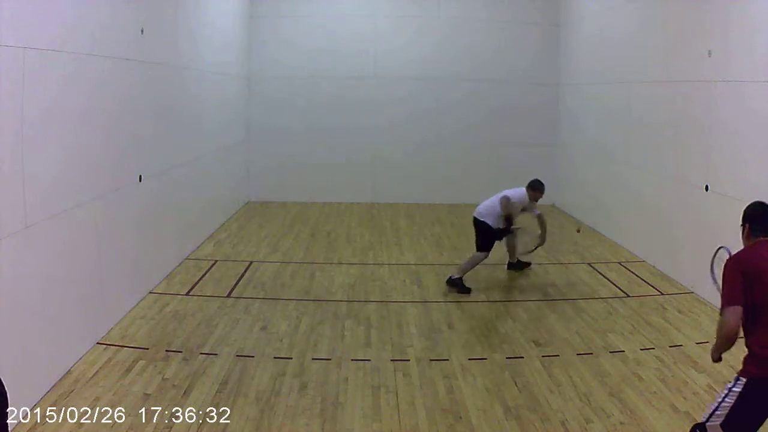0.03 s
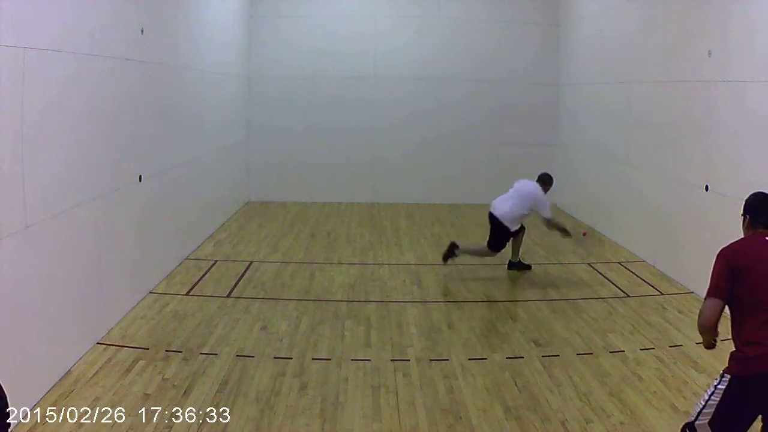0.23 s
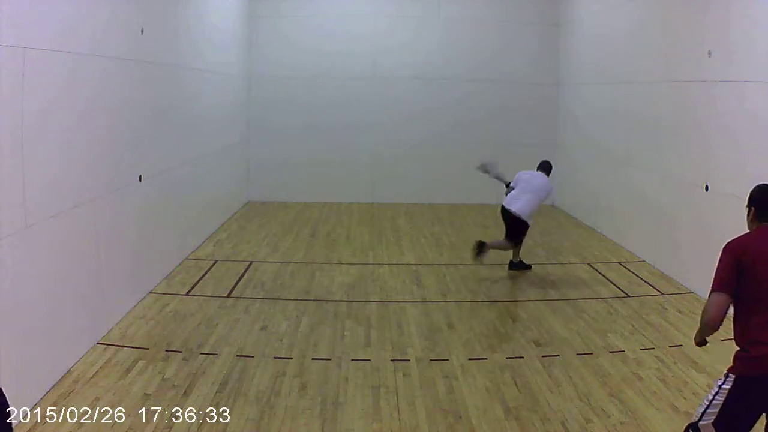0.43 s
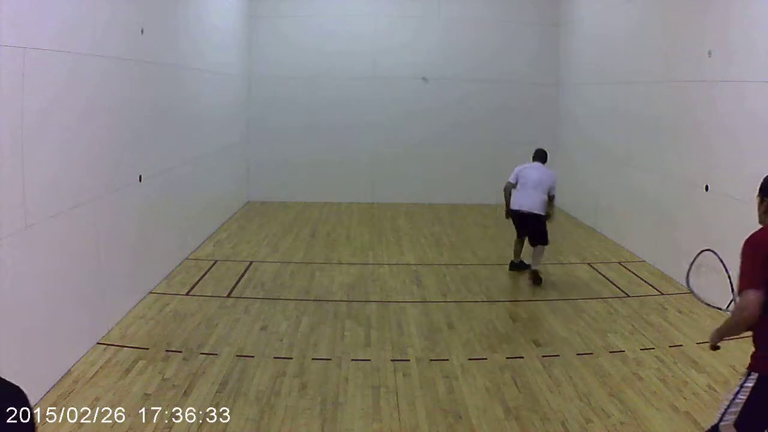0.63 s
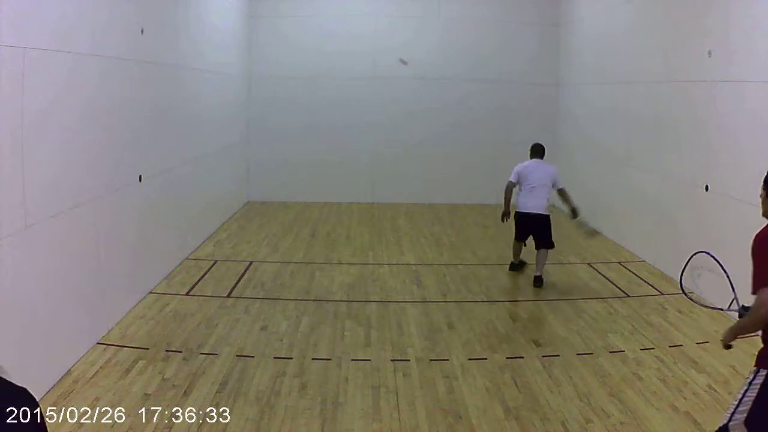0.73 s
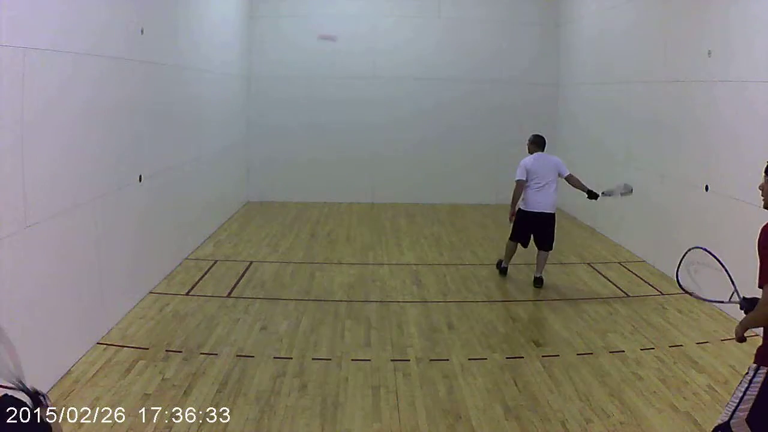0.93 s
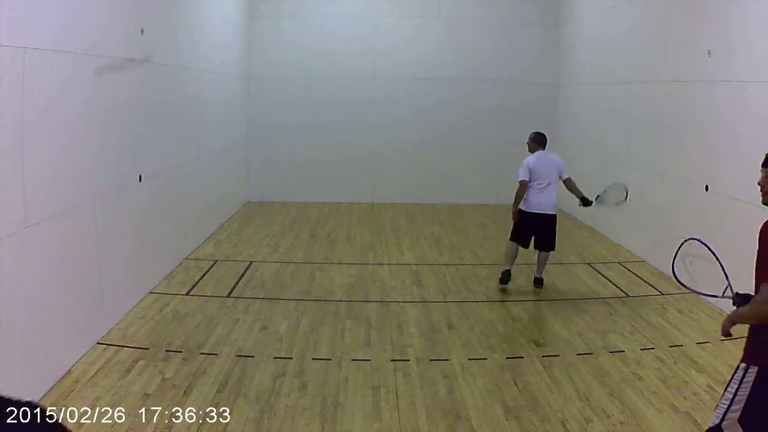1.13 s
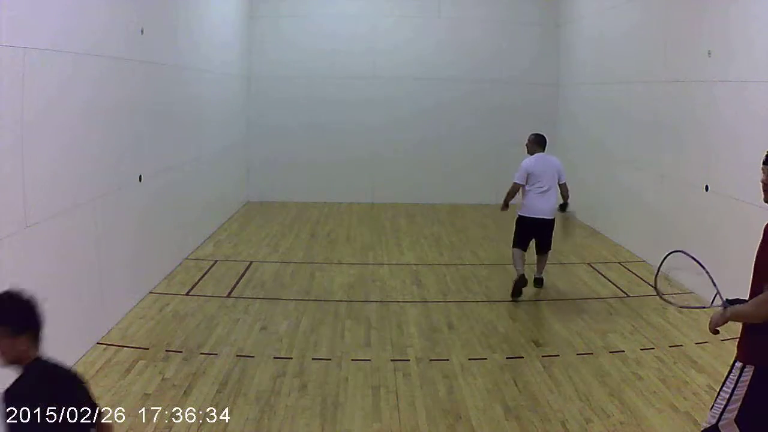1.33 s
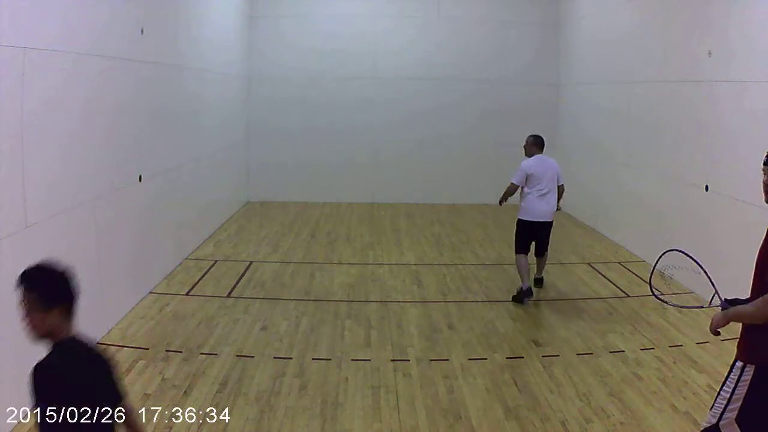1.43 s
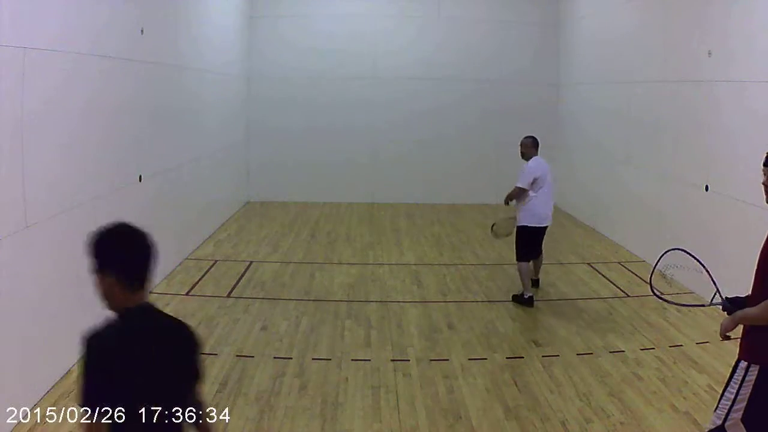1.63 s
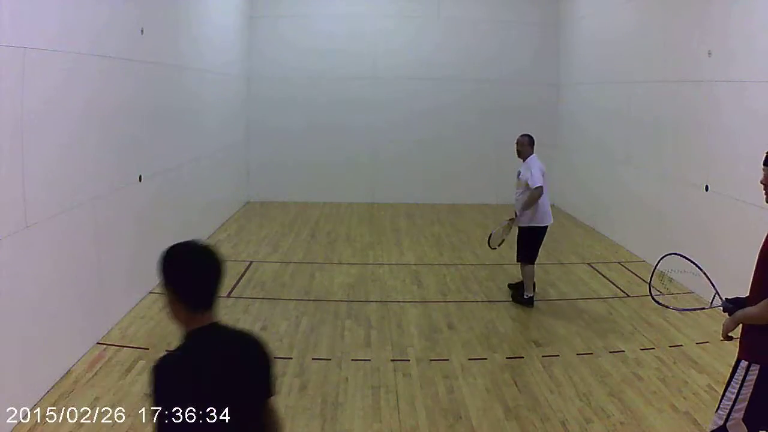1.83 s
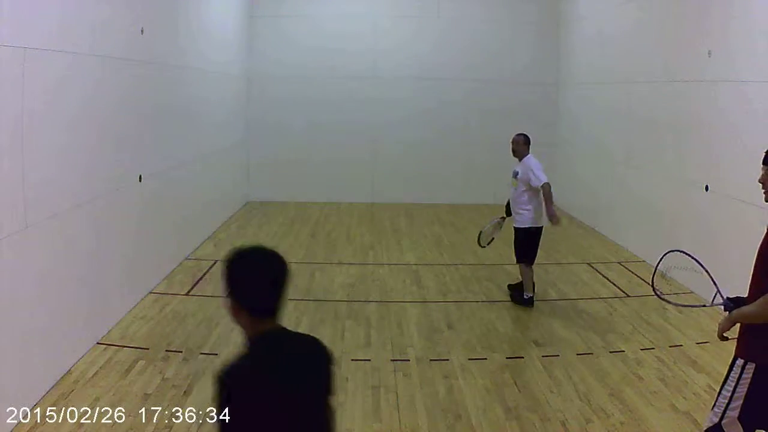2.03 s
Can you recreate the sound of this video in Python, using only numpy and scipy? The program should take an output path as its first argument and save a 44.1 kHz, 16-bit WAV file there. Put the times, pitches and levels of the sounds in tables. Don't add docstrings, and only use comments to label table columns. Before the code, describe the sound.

Three quick ball impacts, the second loudest and clipped, burst into a huge ringing reverberation in a closed court; later a faint bounce and soft footfalls on boards, heard distantly through a dull microphone.

```python
import sys
import numpy as np
from scipy import signal
from scipy.fft import rfft, irfft
from scipy.io import wavfile

SR = 44100
rng = np.random.default_rng(int(sys.argv[2]) if len(sys.argv) > 2 else 0)


def wav_record(signal):
    frames = np.transpose(np.atleast_2d(signal))
    bounded = np.clip(frames, -1, 1)
    quanta = np.round(bounded * 32767).astype(np.int16)
    wavfile.write(sys.argv[1], SR, quanta)


def how_loud(loudness_db):
    steps = np.asarray(loudness_db, float) / 20
    return 10 ** steps


N = 92610


def evened(x):
    return x / np.sqrt(np.mean(x ** 2) + 1e-20)


def read(points, hz):
    f, value = np.transpose(points)
    return np.interp(np.log(hz + 1), np.log(f + 1), value)


def add(mix, s, sound):
    part = mix[round(s * SR):][:len(sound)]
    part += sound[:len(part)]


def colour(x, points):
    gain = how_loud(read(points, np.fft.rfftfreq(len(x), 1 / SR)))
    return irfft(rfft(x) * gain, len(x))


def ring(hz, db, t60, t):
    return how_loud(db - 60 * t / t60) * np.sin(2 * np.pi * hz * t)


def hall_air():
    # (frequency [Hz], level [dB per Hz])
    hum_density = [(20, -8), (64, -3.5), (140, -3.5), (230, -12), (900, -17), (1650, -23.5), (1950, -34),
                   (8000, -37.5)]
    return how_loud(-33) * evened(colour(rng.standard_normal(N), hum_density))


def court(direct_db):
    # (frequency [Hz], reverberation time t60 [s])
    decay_times = [(60, 0.4), (150, 0.4), (300, 4.82), (800, 5.61), (1600, 3.84), (2600, 3.13), (4000, 1.8),
                   (8000, 1.1)]
    # (delay [s], gain against the direct sound)
    first_echoes = [(.0031, .9), (.0057, -1.1), (.0093, 1.1), (0.0139, -0.33), (.0178, .45)]
    build_s, flutter_s, flutter_db, flutter_fade_s = 0.0067, 0.065, -0.5, 0.59
    spacing = 20
    taps, t = np.zeros(2 * N), np.arange(2 * N) / SR
    at = np.arange(0, 2 * N - spacing, spacing)
    taps[at + rng.integers(0, spacing, len(at))] = rng.choice([-1., 1.], len(at))

    hz, frame_s, spectrum = signal.stft(taps, SR, nperseg=1024)
    decay = how_loud(-60 * frame_s / read(decay_times, hz)[:, None])
    tail = signal.istft(spectrum * decay, SR, nperseg=1024)[1][:2 * N]

    flutter = flutter_db * np.exp(-t / flutter_fade_s) * np.cos(2 * np.pi * t / flutter_s)
    tail = tail * how_loud(flutter) * (1 - np.exp(-t / build_s))
    front = 1. * (t == 0)
    for s, gain in first_echoes:
        front[round(s * SR)] = gain
    return tail / 15 + how_loud(direct_db + 16) * front


def steps():
    # (time [s], level [dB], floor pitch [Hz], t60 [s])
    footfalls = [(.01, -41, 101.7, 0.15), (1.10, -34, 99.4, 0.54), (1.284, -33, 206, 0.18),
                 (1.288, -26.5, 94, 0.35), (1.35, -35, 163.6, 0.82), (1.446, -44.5, 140, 0.28),
                 (1.537, -32.5, 107.8, 0.21), (1.612, -30.5, 105.9, 0.57), (1.675, -33, 152.7, 0.55),
                 (1.889, -36.5, 147.8, 0.1)]
    wet_db, mode_spread, rise_s = 11, 0.288, 0.0029
    out, t = np.zeros(N), np.arange(SR // 2) / SR
    for s, db, hz, t60 in footfalls:
        jitter = 0.37 * rng.uniform(-0.925, 1, 5)
        ratios = np.exp(mode_spread * (np.linspace(-1, 1, 5) + jitter))
        thud = sum(ring(hz * k, db, t60 / k, t) for k in ratios)
        add(out, s, thud * np.minimum(t / rise_s, 1))
    boom = signal.fftconvolve(out, court(direct_db=-61))[:N] / 10
    return out + how_loud(wet_db) * boom


def blow(low_db, crack_db):
    # (frequency [Hz], level [dB], t60 [s])
    shell_modes = [(640.6, 9, 0.012), (778.4, 11, 0.014), (951.7, 4.5, 0.011), (1646, -9.5, 0.06),
                   (1250, -13, 0.011)]
    # (frequency [Hz], level [dB], t60 [s])
    low_modes = [(304.7, 4, 0.028), (374.4, -0.5, 0.039), (140, -6, 0.074), (73, -8, 0.057)]
    contact_s, crack_rise_s = 0.0011, 0.00033
    t = np.arange(4000) / SR
    tune = 1 + 0.034 * rng.standard_normal()
    shell = sum(ring(hz * tune, db, t60, t) for hz, db, t60 in shell_modes)
    inside = sum(ring(hz * tune, db + low_db, t60, t) for hz, db, t60 in low_modes)
    crack = ring(2860, crack_db + 29.5, 0.0024, t)
    snap = ring(3930, crack_db + 23, 0.0034, t)
    body = (shell + inside) * np.minimum(t / contact_s, 1)
    return (body + (crack + snap) * np.minimum(t / crack_rise_s, 1)) / 4


def ball():
    # (time [s], level [dB], low ring [dB], crack [dB], direct sound [dB])
    ball_hits = [(.226, -3.5, -1.5, -25.5, -31), (.3868, 3.5, -1, -9, -30), (.455, -4, -12.5, -6.5, -39),
                 (1.2836, -25.5, -1, -20, -7.5)]
    # (time [s], level [dB])
    wall_returns = [(.250, -24), (.279, -21.5), (.4, -11), (.424, -15.5), (.472, -15.5), (.518, -16.5),
                    (.552, -20), (.594, -18.5), (.621, -21.5), (.683, -20.5), (.759, -26), (.806, -20),
                    (.934, -24.5)]
    scatter_s = 0.0078
    out, t = np.zeros(N), np.arange(1500) / SR

    earlier = signal.fftconvolve(blow(low_db=-14, crack_db=-32), court(direct_db=-30))[SR:]
    add(out, 0, how_loud(-49) * earlier)
    for s, db, low_db, crack_db, direct_db in ball_hits:
        add(out, s, how_loud(db) * signal.fftconvolve(blow(low_db, crack_db), court(direct_db)))
    for s, db in wall_returns:
        sparse = rng.standard_normal(len(t)) * (rng.random(len(t)) < .05)
        bunch = sparse * t / scatter_s * np.exp(-t / scatter_s)
        add(out, s, how_loud(db + 7.5) * np.convolve(bunch, blow(low_db=1, crack_db=-27)))
    return out


def muffle(sound):
    # (frequency [Hz], gain [dB])
    mic_response = [(30, -11), (200, 9), (480, 14), (1200, 14), (1800, 10.5), (2100, 0), (3000, -9.5),
                    (8000, -19)]
    taps = irfft(how_loud(read(mic_response, np.fft.rfftfreq(1024, 1 / SR))))
    return signal.oaconvolve(sound, np.roll(taps, 512) * np.hanning(1024), "same")


def scene():
    air = hall_air()
    return (muffle(ball() + steps()) + air)[None]


def band_limit(x):
    return signal.sosfilt(signal.butter(12, 16260, fs=SR, output="sos"), x)


def record(dry):
    offset, preamp_limit, edge_hz, ceiling = -.0085, .722, 8100, .712
    overloaded = np.clip(dry + offset, -preamp_limit, preamp_limit)
    low_pass = signal.firwin(255, edge_hz, window=("kaiser", 9), fs=SR)[None]
    narrow = signal.oaconvolve(overloaded, low_pass, "same")
    return band_limit(np.clip(narrow, -ceiling, ceiling))


dry = scene()
out = record(dry)
wav_record(out)
```